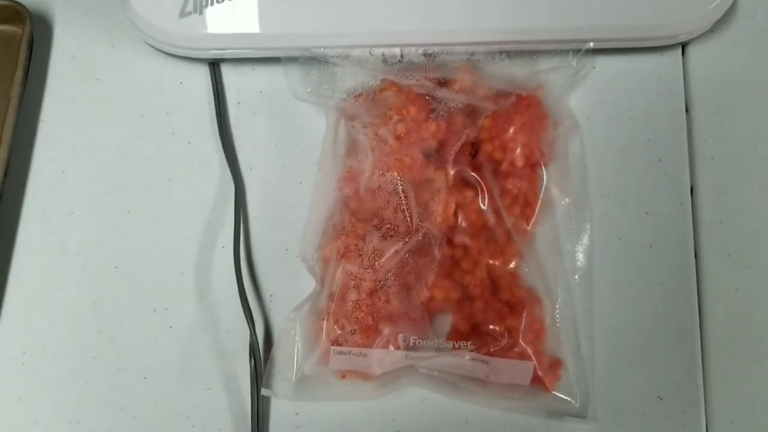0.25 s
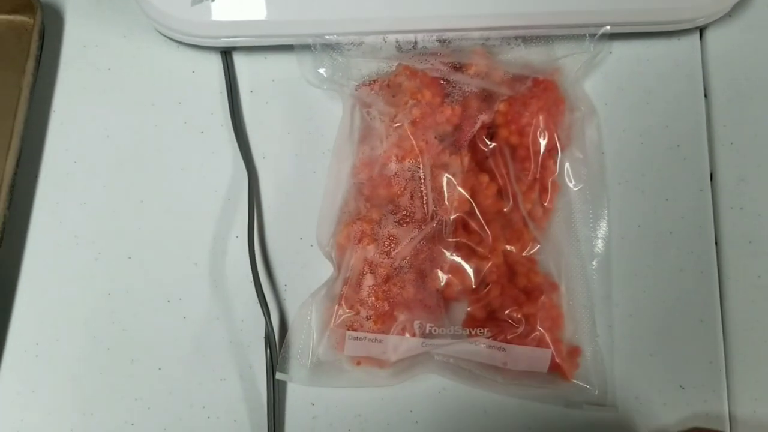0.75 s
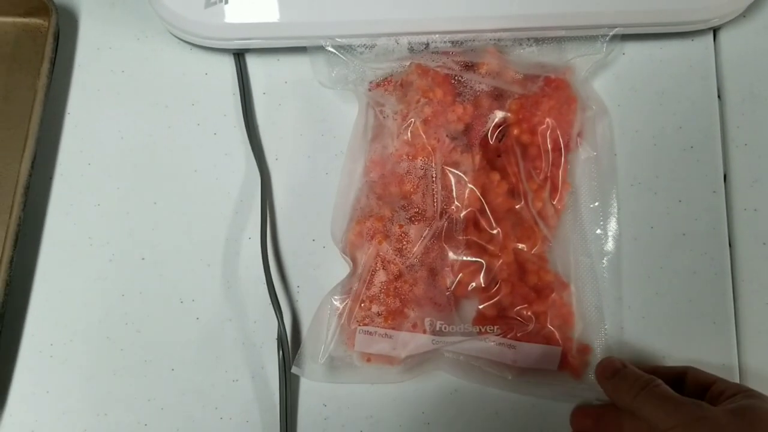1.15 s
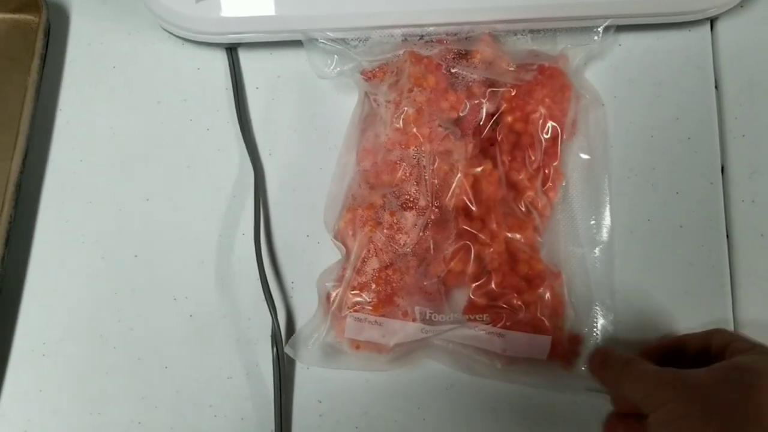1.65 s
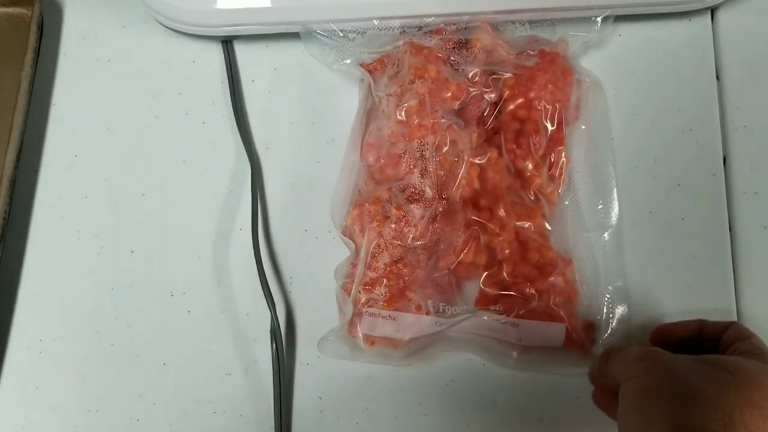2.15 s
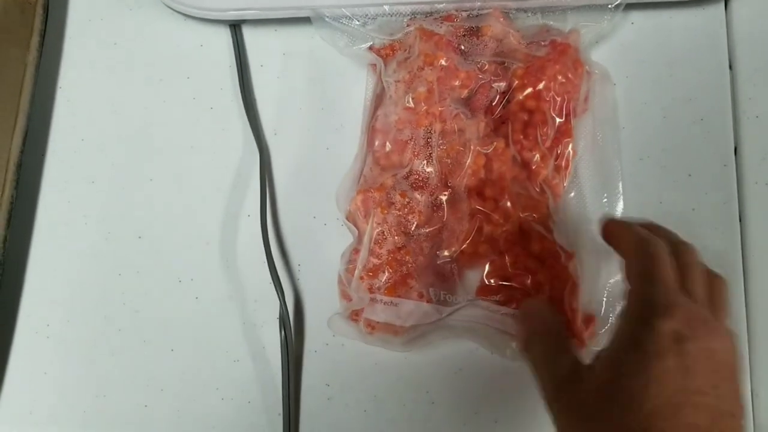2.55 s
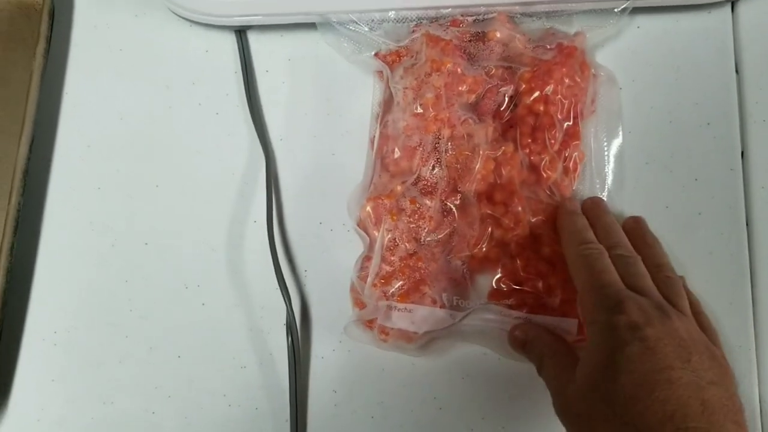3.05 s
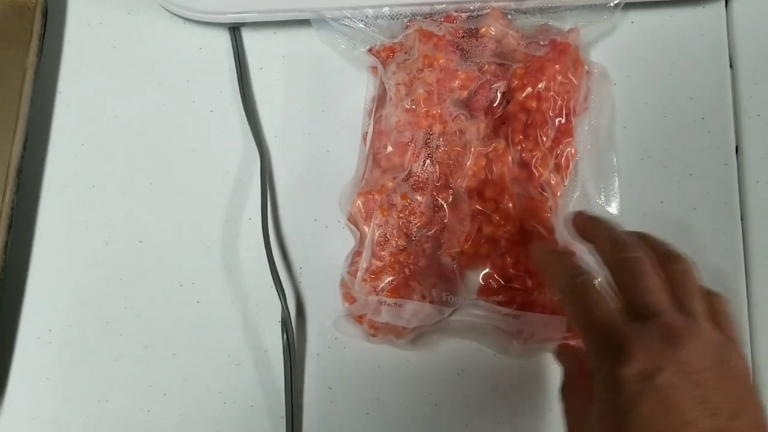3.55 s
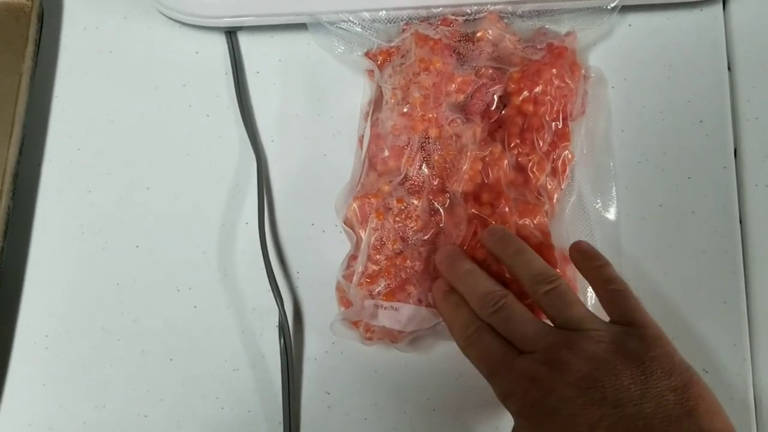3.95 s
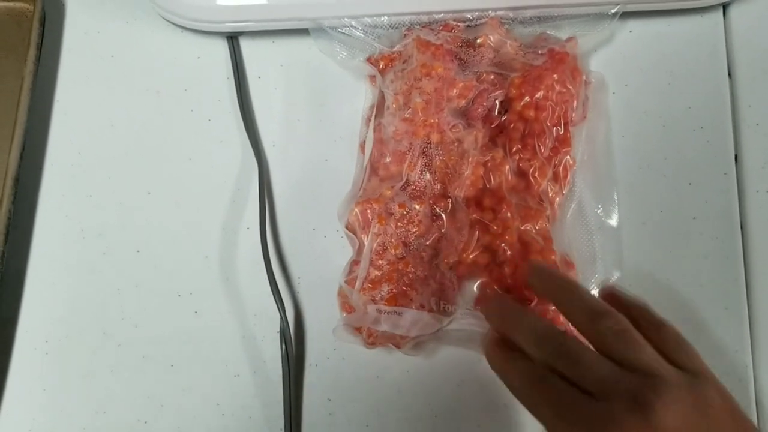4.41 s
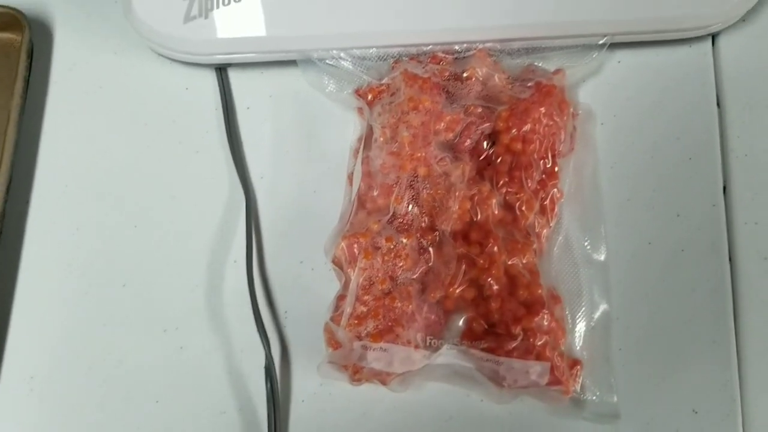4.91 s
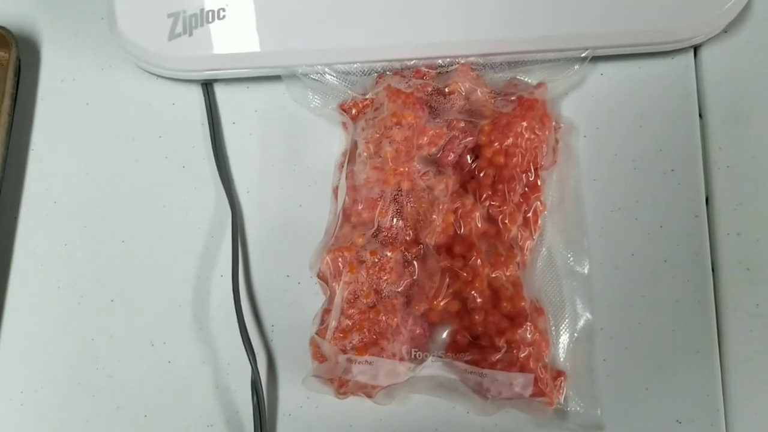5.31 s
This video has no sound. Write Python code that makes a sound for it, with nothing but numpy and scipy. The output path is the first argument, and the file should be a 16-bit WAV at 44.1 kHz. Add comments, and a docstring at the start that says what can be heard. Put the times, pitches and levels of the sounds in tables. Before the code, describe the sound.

A vacuum sealer pump hums and knocks steadily while a plastic bag crackles and snaps, shrinking tight around food.

```python
"""Kitchen: a countertop vacuum sealer pulls the air out of a food bag. Its diaphragm pump hums and its valves
slap once a turn; as the vacuum builds it slows and knocks harder. Air hisses in the channel. The film crackles
and snaps as it shrinks round the food, the contents shift with dull pops, and the film slips once. After some
hard snaps the steady sounds dip and creep back. Low room rumble, short reflections."""
import sys
import numpy as np
from scipy import signal
from scipy.fft import rfft, irfft, next_fast_len
from scipy.io import wavfile
from scipy.ndimage import uniform_filter1d

SR = 44100
rng = np.random.default_rng(int(sys.argv[2]) if len(sys.argv) > 2 else 0)


def log_audio(samples):
    """Write samples as a 16-bit WAV file to the path given in sys.argv[1]."""
    # one column per channel
    frames = np.atleast_2d(samples).T
    # limit to full scale, then quantise
    limited = np.clip(frames, -1, 1)
    pcm = np.round(limited * 32767).astype(np.int16)
    wavfile.write(sys.argv[1], SR, pcm)


N = 245637
TIME_S = np.arange(N) / SR

# suction: time_s, vacuum (0 free flow, 1 full)
VACUUM_CURVE = [(0, 0), (1.6, 0.1), (2.4, 0.41), (3.25, 0.6), (4.1, 0.75), (4.4, 0.83), (4.8, 0.93),
                (5.57, 0.92)]
# motor speed: time_s, turns_per_s
MOTOR_SPEED = [(0, 49.18), (1.4, 49.17), (1.9, 49.0), (2.8, 48.27), (3.2, 47.86), (4, 47.26), (4.3, 46.72),
               (4.45, 46.24), (4.85, 45.97), (5.3, 46.32), (5.57, 46.81)]
# dips of the steady sounds: start_s, drop_db
LEVEL_DIPS = [(0.489, 4.5), (1.064, 2.5), (1.4, 1.4), (1.717, 2.5), (4.375, 2.5), (5.124, 4)]

# noise spectra: frequency_hz, relative_density_db
RUMBLE_SPECTRUM = [(25, -1), (55, -15), (90, -2), (150, 21), (400, -9), (1000, -54)]
HISS_SPECTRUM = [(1200, 5.5), (2300, 3), (3400, -1), (5500, -4), (7600, -3), (9200, -13), (12000, -5),
                 (15300, -11.5), (16000, -7)]
FILM_SPECTRUM = [(1300, -35), (2400, 2), (3400, -3.5), (5500, 4), (7500, 7.5), (9200, -11), (12000, -3.5),
                 (15500, 0)]
PUFF_SPECTRUM = [(90, 12), (150, 9.5), (400, 16), (800, 6), (1200, -35), (1700, -24), (2800, -48)]

# source levels: level_db at even vacuum steps, 0 to 1
HISS_LEVELS_DB = (-32.5, -33.5, -34, -31, -29.5, -32.5)
CRACKLE_LEVELS_DB = (-39, -35.5, -30.5, -32.5)
KNOCK_LEVELS_DB = (-31.5, -37.5, -37, -27.5, -34.5, -31)
SLAP_LEVELS_DB = (-25, -29.5, -30.5, -28.5, -24.5, -26.5)
CLACK_LEVELS_DB = (-37.5, -43, -40.5, -32.5, -30.5, -32.5)

# loud film snaps: start_s, level_db, low_band_relative_db, ring_hz
LOUD_SNAPS = [(0.1978, -15, -8.5, 4870), (0.4012, -6, -20, 7550), (0.4584, -9.5, -13, 7200),
              (0.4906, -14, -16, 7200), (0.5038, -7, -18, 5340), (0.5913, -19, -6.5, 4980),
              (0.6394, -9, -31, 5370), (0.9394, -6.5, -15.5, 5300), (1.063, -9, -16.5, 3440),
              (1.1588, -13, -20, 5050), (1.2496, -13, -29, 6090), (1.2862, -15, -17, 5500),
              (1.3468, -9, -17, 4100), (1.3944, -10, -18, 7600), (1.4421, -6, -18, 5270),
              (1.5993, -15, -17, 7590), (1.6619, -13, -13, 7660), (1.716, -10, -20.5, 7100),
              (1.9866, -17.5, -15.5, 7210), (2.0542, -16, -27, 5400), (2.1197, -10.5, -30, 6400),
              (2.2533, -13.5, -16, 7400), (2.2606, -25, -3.5, 5900), (2.3947, -11, -16.5, 4600),
              (2.4489, -12, -27, 5860), (2.5672, -9, -25, 5330), (2.7878, -8, -26, 6560),
              (2.9537, -9.5, -25, 5640), (2.9893, -9.5, -30, 7440), (3.0208, -12, -29.5, 5700),
              (3.0662, -8.5, -18.5, 7700), (3.1313, -15.5, -19, 4670), (3.1917, -10, -12.5, 6800),
              (3.2804, -12, -24, 7550), (3.33, -12, -19.5, 5060), (3.453, -12.5, -35, 7500),
              (3.68, -14, -16, 6460), (3.8587, -12.5, -23, 6200), (3.917, -13, -22, 6040),
              (4.3444, -6.5, -17, 5000), (4.375, -6.5, -20, 6000), (4.5765, -9.5, -17.5, 5950),
              (4.6397, -8.5, -37, 5600), (4.704, -7.5, -23, 7050), (4.973, -14, -21, 7420),
              (5.028, -16, -12.5, 3880), (5.046, -10.5, -32, 6500), (5.123, -6.5, -42.5, 5330),
              (5.3522, -13.5, -33.5, 7200), (5.4114, -10.5, -25, 5940)]
# dull pops of the stretched bag: start_s, peak_db, ring_hz
BAG_POPS = [(0.4607, -15.5, 1780), (0.642, -17, 1300), (.941, -18, 1000), (2.0543, -19.5, 1150),
            (2.281, -20, 1340), (2.637, -19.5, 1370), (3.681, -27, 1400), (4.346, -21, 1310),
            (4.7043, -17, 1320)]

# pump hum, one row per harmonic from the first: level_db at even vacuum steps
HUM_HARMONICS_DB = [(-52.5, -55, -45), (-54, -46, -50, -45, -40.5, -52), (-25.5, -24.5, -29, -25, -25, -28),
                    (-40.5, -49, -57, -38.5, -25.5, -23.5), (-26, -28, -28.5, -26.5, -27, -26),
                    (-32.5, -38.5, -40, -34, -29, -55), (-43.5, -43.5, -40, -32, -29, -37.5),
                    (-44, -44.5, -53, -51, -43.5, -43.5)]
# valve contacts in a turn: free_phase_turns, vacuum_phase_turns, free_force_db, vacuum_force_db
VALVE_CONTACTS = [(.01, .03, 0, 0), (.33, .27, -14, -9), (.44, .4, -23, -19), (.71, .58, -22, -20)]
# pump resonances: pitch_hz, width_hz, relative_db at four even vacuum steps
HOUSING_MODES = [(440.8, 19.8, 0, -4, 7.5, -6), (486, 44, 0, -9, -11.5, -1), (573, 19, 0, 3, 2.5, -19),
                 (627, 14, 2.5, 0, 3.5, 3), (723, 14, 1.5, 11, -1, -2), (781.7, 8.6, -3.5, -28, -1, 3)]
VALVE_MODES = [(904, 90, -6.5, -6.5, -8, -3), (1048.2, 41.5, 0.5, -0.5, -3.5, 4),
               (1226.5, 129, 4.5, 3, -2, -2.5), (1297.4, 197, 0, -5.5, -10.5, -5)]
VALVE_EDGE_MODES = [(1765, 52, -19, -9, 3.5, 8.5), (1958, 55, 6, 3, 0, -1), (2206, 96, 9, -9, -14.5, 2),
                    (2827, 38, -0.5, 19, 4, 2)]


def from_db(db):
    """Decibels to gain."""
    return 10 ** (np.asarray(db) / 20)


def unit_rms(x):
    """Scale to unit power."""
    return x / np.sqrt(np.mean(x ** 2) + 1e-20)


def over_time(curve):
    """Breakpoint curve at every sample."""
    return np.interp(TIME_S, *np.transpose(curve))


def at_vacuum(steps, vacuum):
    """Interpolate values given at even vacuum steps."""
    return np.interp(vacuum, np.linspace(0, 1, len(steps)), steps)


def drift(rate_hz):
    """Slow random wander, unit RMS."""
    knots = rng.standard_normal(2000)
    return unit_rms(np.interp(TIME_S * rate_hz, np.arange(len(knots)), knots))


def band(x, low_hz, high_hz):
    """Gentle band-pass."""
    return signal.sosfilt(signal.butter(2, [low_hz, high_hz], "band", fs=SR, output="sos"), x)


def resonate(x, hz, width_hz):
    """One resonance, unit peak gain."""
    radius = np.exp(-np.pi * width_hz / SR)
    feedback = [1, -2 * radius * np.cos(2 * np.pi * hz / SR), radius ** 2]
    return signal.lfilter(np.array([1, 0, -1]) * (1 - radius ** 2) / 2, feedback, x + 1e-18)


def noise_pair(spectrum, envelope=1):
    """Two independent noises, enveloped, then shaped to a spectrum; unit power."""
    noise = envelope * rng.standard_normal((2, N))
    hz, density_db = np.transpose(spectrum)
    size = next_fast_len(N)
    bin_hz = np.fft.rfftfreq(size, 1 / SR) + 1
    gain = from_db(np.interp(np.log(bin_hz), np.log(hz), density_db))
    low_cut = np.minimum(bin_hz / hz[0], 1) ** 2
    return unit_rms(irfft(rfft(noise, size) * gain * low_cut, size)[..., :N])


def pan(x, left_db):
    """Place in stereo; left_db is left minus right."""
    gains = from_db(np.array([[left_db], [-left_db]]) / 2)
    return x * gains / gains.mean()


def spread(pair, correlation):
    """Independent pair to partly correlated left and right."""
    return pair[0] + np.sqrt((1 - correlation) / (1 + correlation)) * pair[1] * [[1], [-1]]


def dip_gain(fall_s=0.004, recovery_db_per_s=1.15):
    """Gain that drops at each dip and climbs back steadily."""
    drops_db = sum(db * np.clip((TIME_S - start_s) / fall_s, 0, 1) for start_s, db in LEVEL_DIPS)
    return from_db(np.minimum(recovery_db_per_s * TIME_S - drops_db, 0))


def room_rumble(level_db=-50):
    """Low room background, centred."""
    return from_db(level_db) * spread(noise_pair(RUMBLE_SPECTRUM), correlation=1)


def reflections(x, t60_s=0.14, gap_s=0.003):
    """Diffuse returns from counter and walls, independent in each ear."""
    t = TIME_S[:SR // 2]
    tail = rng.standard_normal((2, len(t))) * from_db(-60 * t / t60_s) * (t > gap_s)
    tail /= np.sqrt(np.sum(tail ** 2, axis=1, keepdims=True))
    return signal.fftconvolve(band(x.mean(axis=0), 267, 6800)[None], tail, axes=1)[:, :N]


def channel_hiss(turns, vacuum, swell_db=1.5):
    """Air in the channel, swelling with each stroke."""
    level_db = at_vacuum(HISS_LEVELS_DB, vacuum) + swell_db * np.cos(2 * np.pi * (turns - .25))
    return pan(from_db(level_db) * spread(noise_pair(HISS_SPECTRUM), correlation=0.033), left_db=-2.5)


def film_crackle(creases_per_s=420, size_db=6.5, clump_db=4, fade_s=0.0014):
    """Tiny creases fold over in clumps, each a noise burst."""
    folds = rng.random(N) < creases_per_s * from_db(clump_db * drift(rate_hz=14)) / SR
    sizes = folds * from_db(size_db * np.minimum(rng.exponential(1, N), 3.4))
    envelope = signal.lfilter([1], [1, -np.exp(-1 / (fade_s * SR))], sizes + 1e-18)
    return pan(spread(noise_pair(FILM_SPECTRUM, envelope), correlation=0.1), left_db=-32)


def film_slip(start_s=5.132, level_db=-26, fade_s=0.043):
    """The film slides tight with a dying hiss."""
    fade = (TIME_S > start_s) * np.exp(-np.abs(TIME_S - start_s) / fade_s)
    hiss = band(band(rng.standard_normal((2, N)), 4800, 8000), 3200, 6900)
    return pan(from_db(level_db) * fade * unit_rms(hiss), left_db=-13)


def content_pops(width_hz=130):
    """The contents of the bag shift, giving dull pops that ring low."""
    out = np.zeros(N)
    for start_s, peak_db, ring_hz in BAG_POPS:
        flip = resonate(signal.unit_impulse(2048), ring_hz, width_hz)
        at = int(start_s * SR)
        out[at:at + len(flip)] += from_db(peak_db) * flip / np.abs(flip).max()
    return pan(out, left_db=-5)


def film_snaps(rows, delay_s=0.0007, rise_s=0.00026, fade_s=0.00072, tail_db=-23, tail_s=0.006,
               ring_db=4, body_db=-9, middle_db=-12):
    """Creases buckle: millisecond bursts that ring briefly in the film."""
    t = TIME_S[:2048]
    out = np.zeros((2, N + len(t)))
    level_samples = np.sum(t < .003)   # band level = energy spread over 3 ms
    envelope = (1 - np.exp(-t / rise_s)) * (np.exp(-t / fade_s) + from_db(tail_db) * np.exp(-t / tail_s))
    for start_s, level_db, low_db, ring_hz in rows:
        noise = spread(rng.standard_normal((2, len(t))), correlation=0.33)
        burst = pan(noise * envelope, left_db=-11.5)
        body = from_db(body_db) * band(burst, 610, 1060)   # food behind the film
        low = band(burst, 1730, 3000) - body
        ring = from_db(ring_db) * resonate(burst, ring_hz, width_hz=890)
        middle = band(band(burst + ring, 3170, 8060), 3400, 8500)
        top = band(burst, 11740, 16000)
        top_db = -13.5 + 0.41 * low_db + rng.normal(scale=2)   # weak lows go with a weak top
        at = int((start_s + delay_s) * SR)
        for part, part_db in (low, low_db), (middle, middle_db), (top, top_db):
            rms = np.sqrt(np.sum(part.mean(axis=0) ** 2) / level_samples)
            out[:, at:at + len(t)] += from_db(level_db + part_db) * part / rms
    return out[:, :N]


def light_snaps(snaps_per_s=8, over_crackle_db=20, low_db=-17, scatter_db=0.8,
                ring_hz=6330, scatter_octaves=0.66):
    """Smaller creases give way at random moments."""
    start_s = np.cumsum(rng.gamma(2, .5, size=100)) / snaps_per_s
    level_draw, low_draw, ring_draw = rng.standard_normal((100, 3)).T
    rows = np.transpose([start_s, over_crackle_db + scatter_db * level_draw,
                         low_db + scatter_db * low_draw, ring_hz * 2 ** (scatter_octaves * ring_draw)])
    return film_snaps(rows[start_s < TIME_S[-1]])


def valve_clicks(turns, vacuum, jitter_s=12e-6, scatter_db=0.3):
    """Valve impacts: one slap and three lighter rebounds per turn."""
    clicks, whole_turns = np.zeros(N), np.arange(int(turns[-1]) + 1)
    load = np.interp(whole_turns, turns, vacuum)
    for free_phase, vacuum_phase, free_db, vacuum_db in VALVE_CONTACTS:
        time_draw, force_draw = rng.standard_normal((len(whole_turns), 2)).T
        contact_turns = whole_turns + free_phase + (vacuum_phase - free_phase) * load
        contact_s = np.interp(contact_turns, turns, TIME_S) + jitter_s * time_draw
        force = from_db(free_db + (vacuum_db - free_db) * load ** 2 - scatter_db * force_draw)
        at = np.clip(contact_s * SR, 0, N - 2)
        clicks[at.astype(int)] += force * (1 - at % 1)   # split between adjacent samples
        clicks[at.astype(int) + 1] += force * (at % 1)
    return clicks


def struck_part(clicks, vacuum, modes, levels_db, band_hz):
    """A pump part rings; mode balance and level shift as the chamber empties."""
    ring = 0
    for k, (hz, width_hz, *mode_db) in enumerate(modes):
        ring = ring + (-1) ** k * from_db(at_vacuum(mode_db, vacuum)) * resonate(clicks, hz, width_hz)
    ring = band(ring, *band_hz)
    power = uniform_filter1d(uniform_filter1d(ring ** 2, size=3700), size=2800)   # over a few turns
    return from_db(at_vacuum(levels_db, vacuum)) * ring / np.sqrt(np.abs(power) + 1e-14)


def valve_puffs(turns, vacuum, swell_db=4, relative_db=-18):
    """A puff of air follows each slap and tracks its level."""
    gain = from_db(at_vacuum(SLAP_LEVELS_DB, vacuum) + relative_db)
    pulses = unit_rms(from_db(swell_db * np.cos(2 * np.pi * (turns - .2))))
    return gain * pulses * spread(noise_pair(PUFF_SPECTRUM), correlation=0.13)


def diaphragm_hum(turns, vacuum, waver_db=0.73):
    """Push and pull once a turn set the harmonic phases; vacuum makes the pull earlier and weaker."""
    push_turns, pull_turns = .2, .71 - .13 * vacuum
    pull_force = .8 - .11 * vacuum
    out = 0
    for k, levels_db in enumerate(HUM_HARMONICS_DB, 1):
        stroke = pull_force * np.exp(-2j * np.pi * k * pull_turns) - np.exp(-2j * np.pi * k * push_turns)
        gain = from_db(at_vacuum(levels_db, vacuum) + waver_db * drift(rate_hz=24.75))
        out = out + gain * np.sin(2 * np.pi * k * turns + np.angle(stroke))
    return np.sqrt(2) * out


def pump(turns, vacuum, valve_lead_turns=0.0795, right_delay_s=90e-6):
    """Hum, air puffs, and valve impacts ringing the housing, valve and valve edge."""
    clicks = valve_clicks(turns + valve_lead_turns, vacuum)
    knock = struck_part(clicks, vacuum, HOUSING_MODES, KNOCK_LEVELS_DB, band_hz=(386, 766))
    slap = struck_part(clicks, vacuum, VALVE_MODES, SLAP_LEVELS_DB, band_hz=(880, 2020))
    clack = struck_part(clicks, vacuum, VALVE_EDGE_MODES, CLACK_LEVELS_DB, band_hz=(1860, 3180))
    clack = np.array([clack, np.interp(TIME_S - right_delay_s, TIME_S, clack)])
    puffs = valve_puffs(turns, vacuum)
    hum = diaphragm_hum(turns, vacuum)
    return pan(hum, -0.027) + pan(knock, -2.3) + pan(slap, -3.5) + pan(clack, -1.1) + pan(puffs, -0.18)


def scene(pump_room_db=-12, bag_room_db=-7):
    """Pump and shrinking bag, close by; loud snaps, pops and slip bypass the dips."""
    turns = np.cumsum(over_time(MOTOR_SPEED)) / SR
    vacuum = over_time(VACUUM_CURVE)
    dips = dip_gain()
    machine = dips * pump(turns, vacuum)
    background = dips * (channel_hiss(turns, vacuum) + room_rumble())
    creasing = dips * from_db(at_vacuum(CRACKLE_LEVELS_DB, vacuum)) * (film_crackle() + light_snaps())
    bag = creasing + film_snaps(LOUD_SNAPS) + content_pops() + film_slip()
    room = from_db(pump_room_db) * reflections(machine) + from_db(bag_room_db) * reflections(bag)
    return background + room + bag + machine


def record(dry, ceiling=0.9, cutoff_hz=15800):
    """Soft-limit the sharpest snaps, then cut the top steeply."""
    rounded = dry / (1 + (dry / ceiling) ** 4) ** .25
    return signal.sosfilt(signal.ellip(10, .1, 80, cutoff_hz, fs=SR, output="sos"), rounded)


dry = scene()
out = record(dry)
log_audio(out)
```